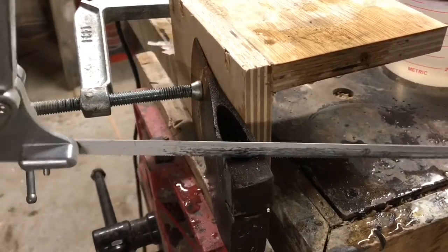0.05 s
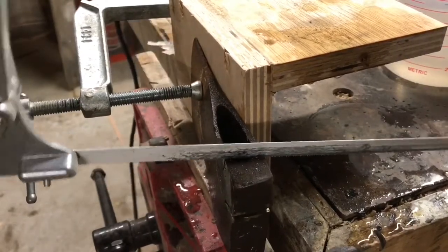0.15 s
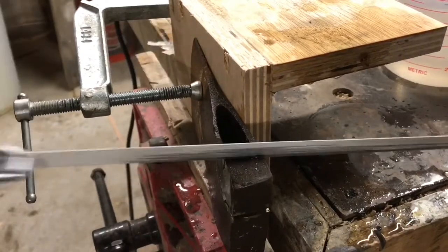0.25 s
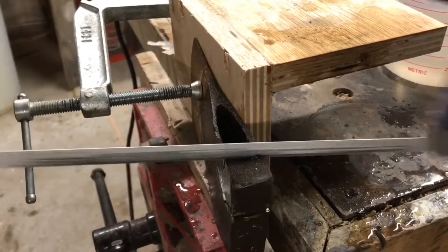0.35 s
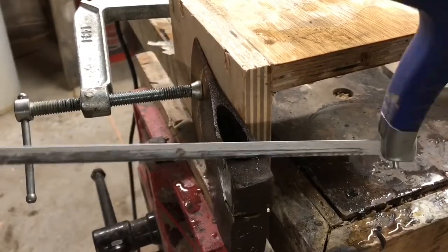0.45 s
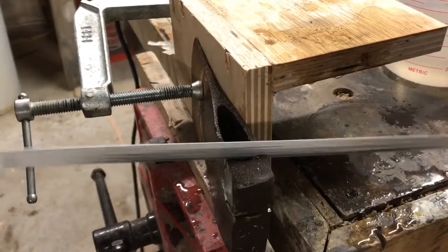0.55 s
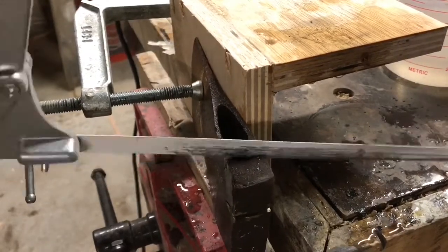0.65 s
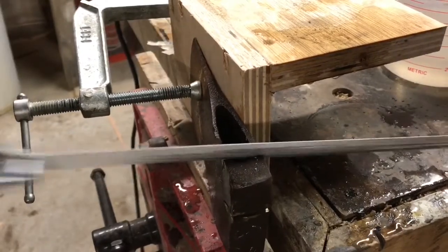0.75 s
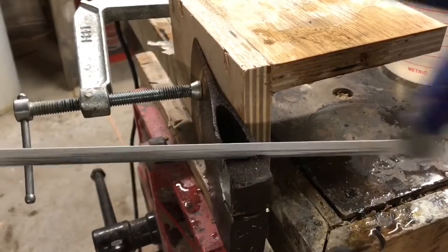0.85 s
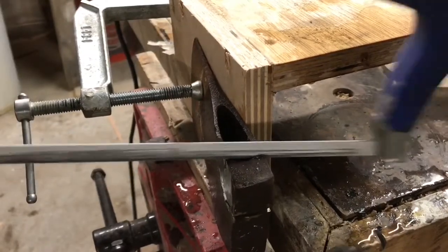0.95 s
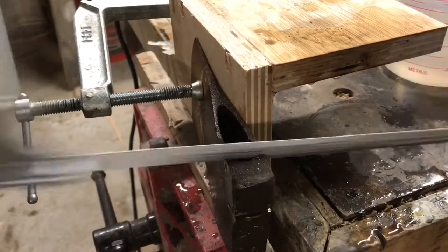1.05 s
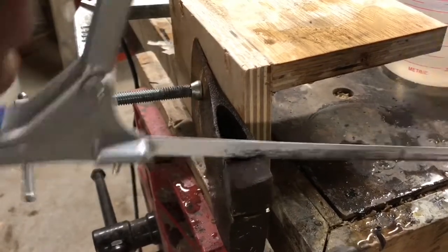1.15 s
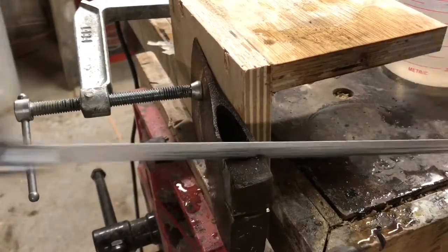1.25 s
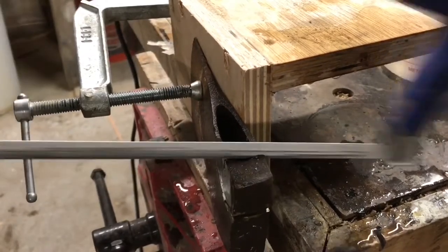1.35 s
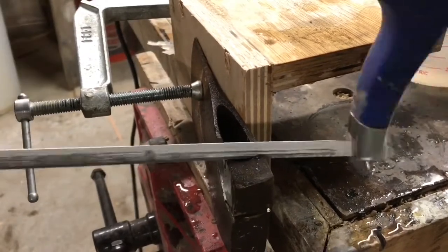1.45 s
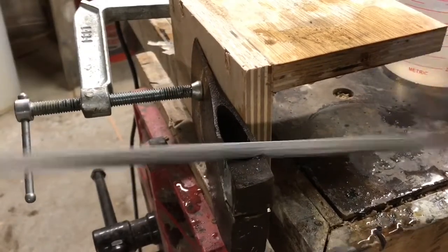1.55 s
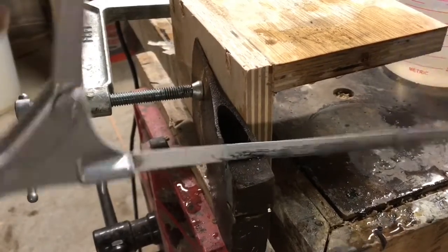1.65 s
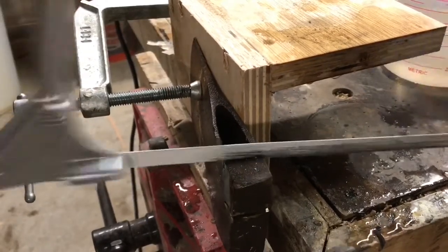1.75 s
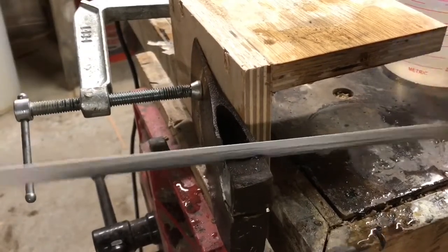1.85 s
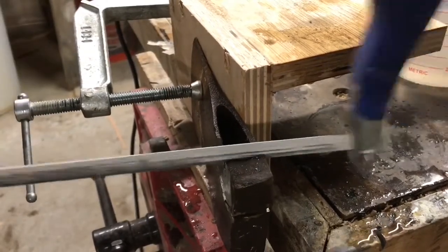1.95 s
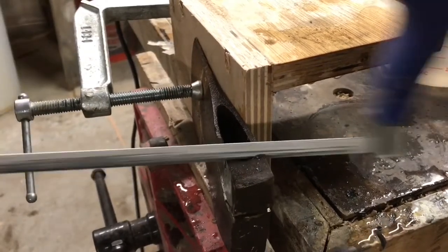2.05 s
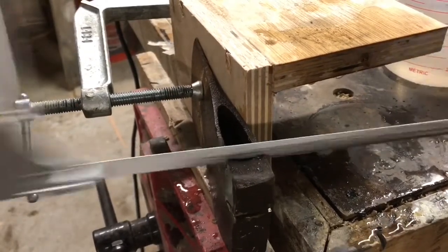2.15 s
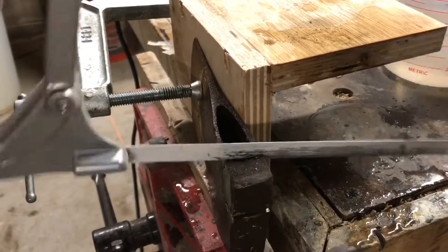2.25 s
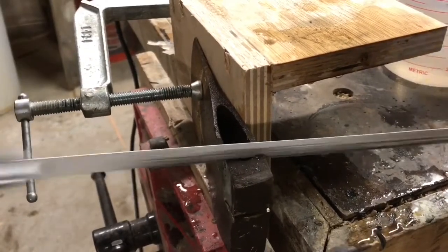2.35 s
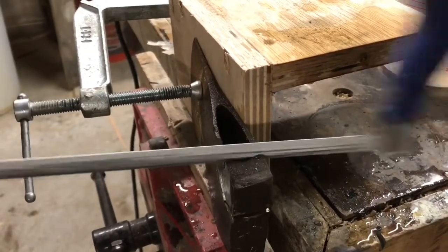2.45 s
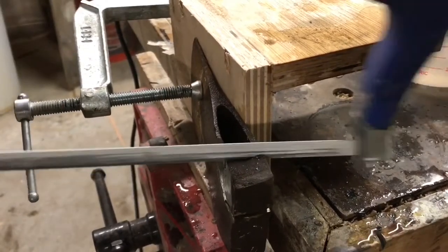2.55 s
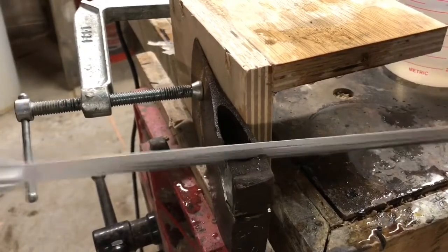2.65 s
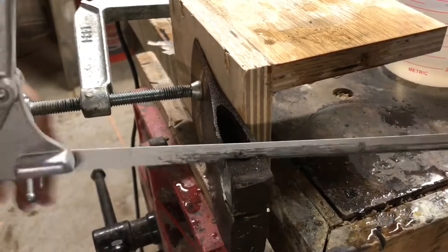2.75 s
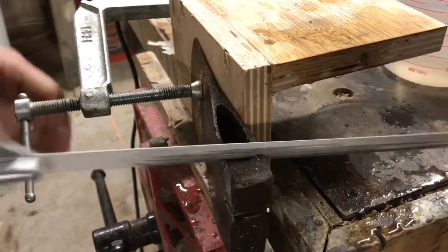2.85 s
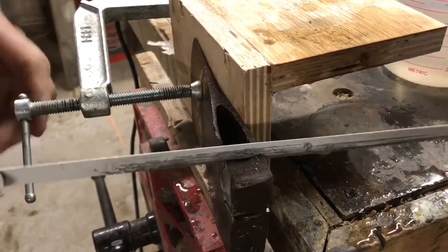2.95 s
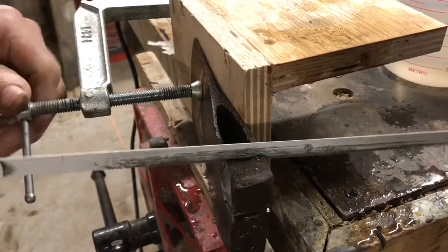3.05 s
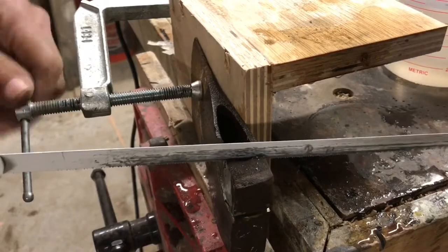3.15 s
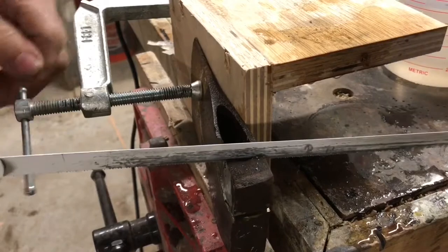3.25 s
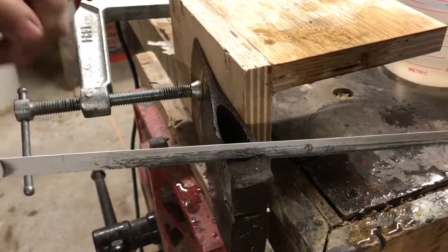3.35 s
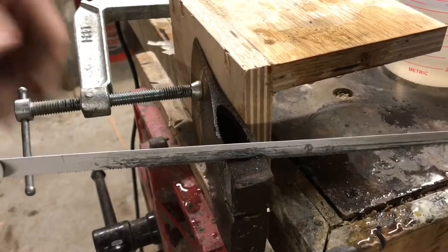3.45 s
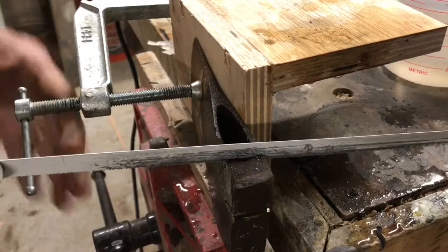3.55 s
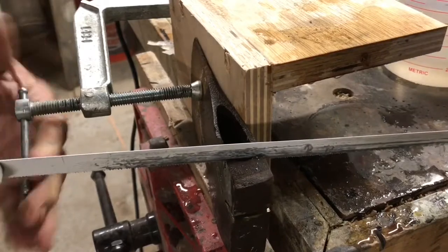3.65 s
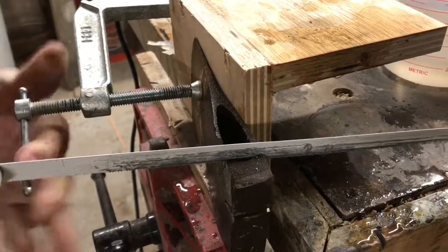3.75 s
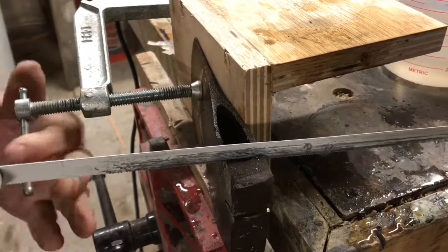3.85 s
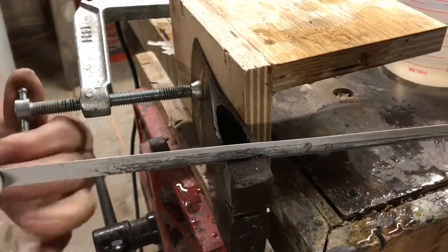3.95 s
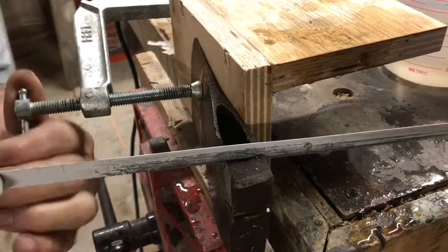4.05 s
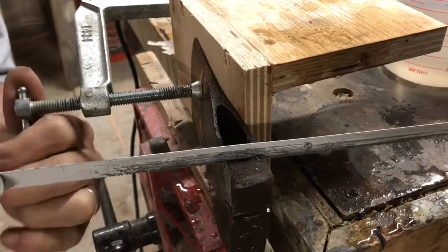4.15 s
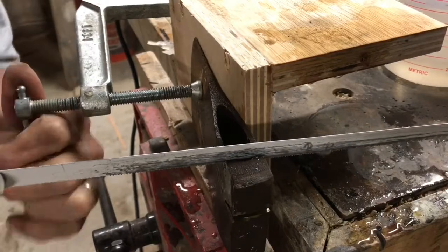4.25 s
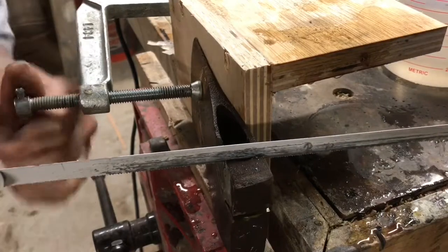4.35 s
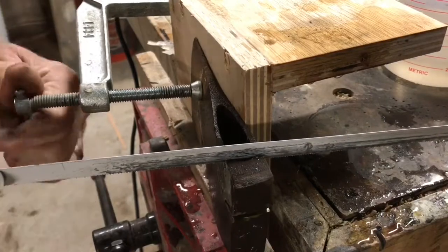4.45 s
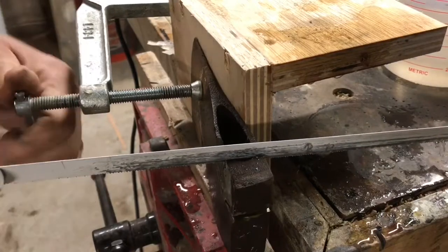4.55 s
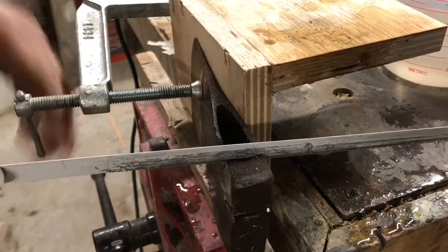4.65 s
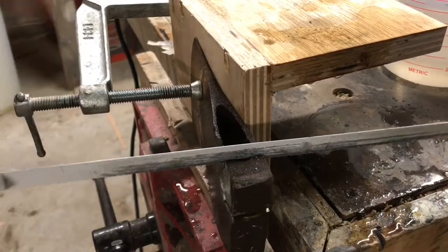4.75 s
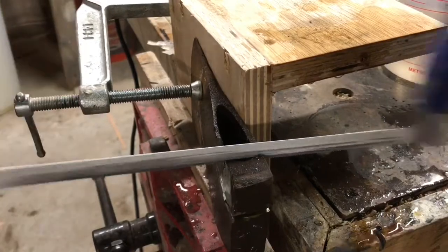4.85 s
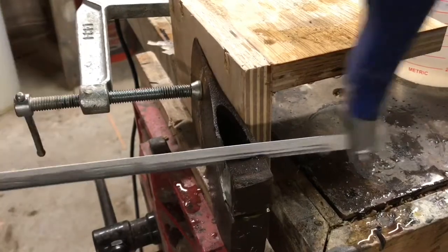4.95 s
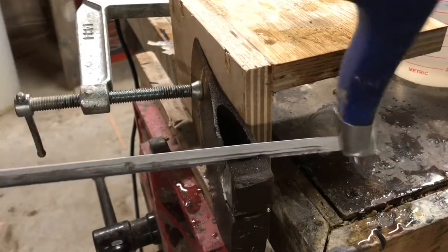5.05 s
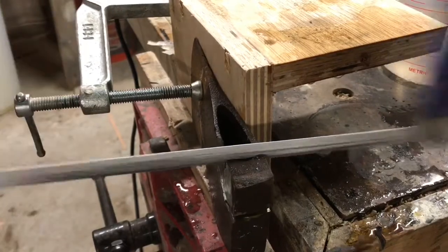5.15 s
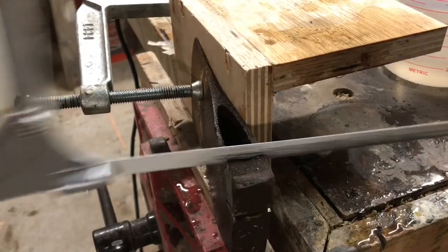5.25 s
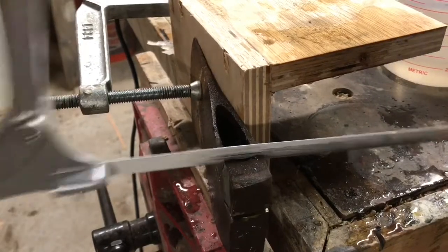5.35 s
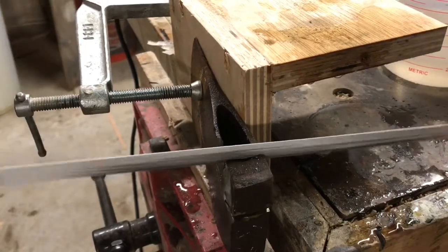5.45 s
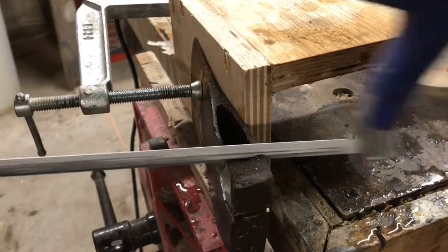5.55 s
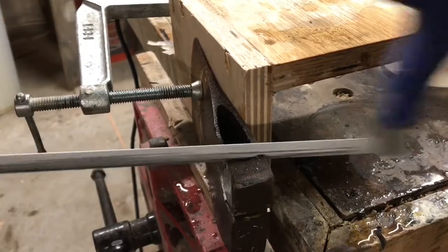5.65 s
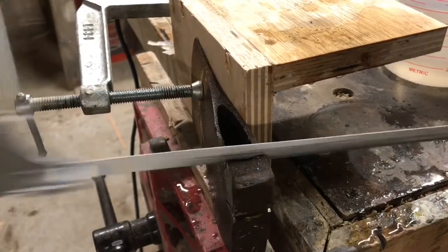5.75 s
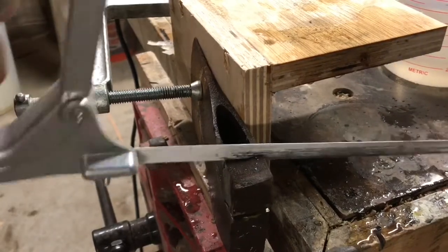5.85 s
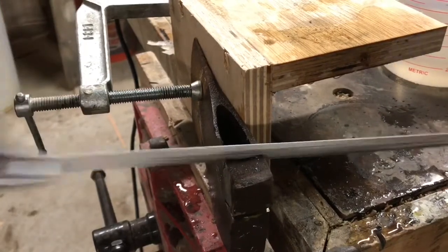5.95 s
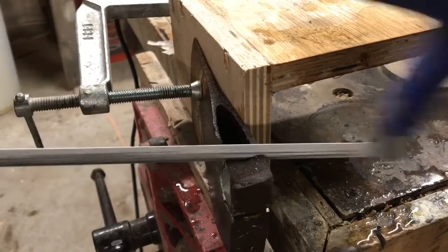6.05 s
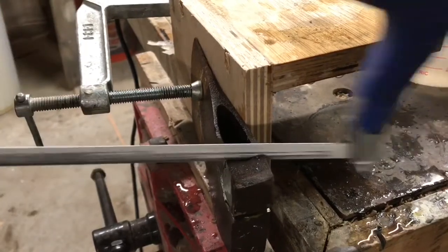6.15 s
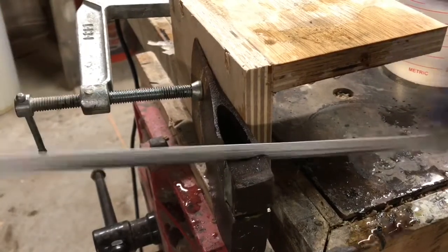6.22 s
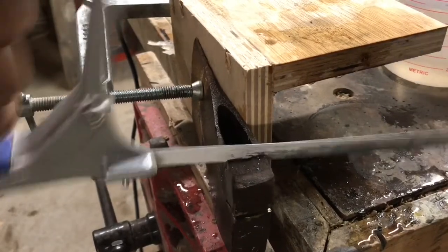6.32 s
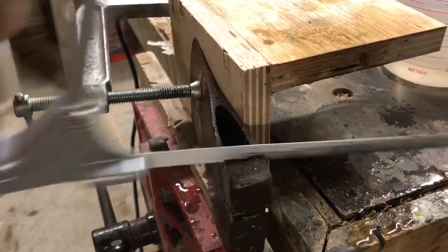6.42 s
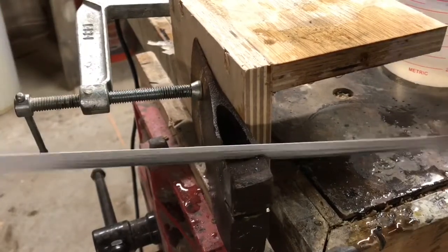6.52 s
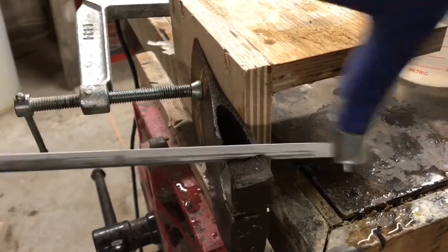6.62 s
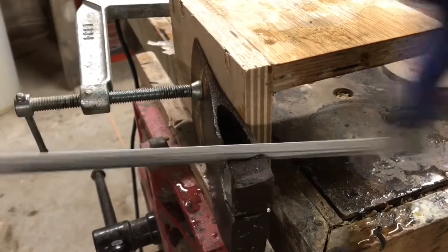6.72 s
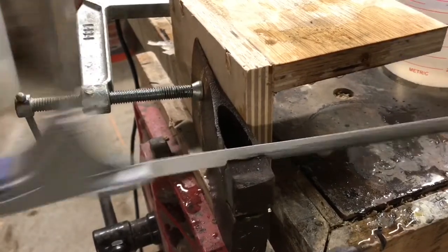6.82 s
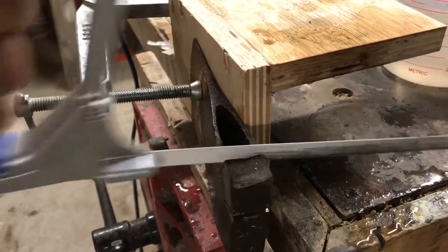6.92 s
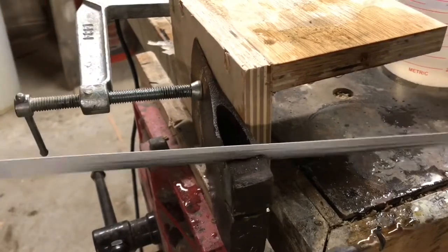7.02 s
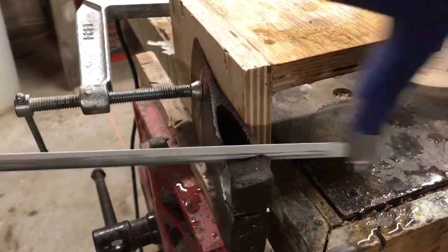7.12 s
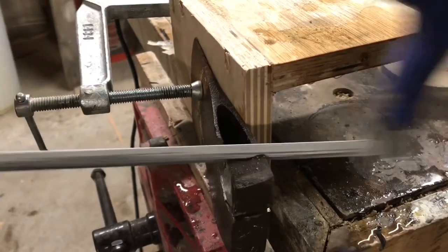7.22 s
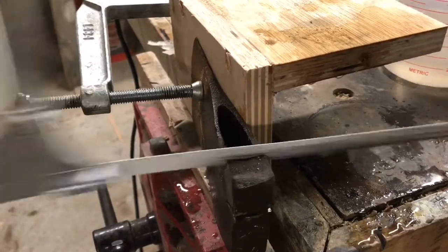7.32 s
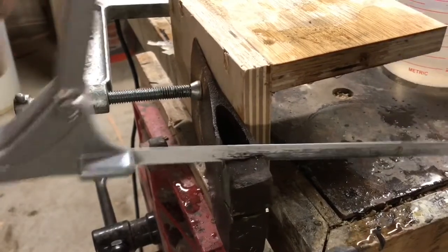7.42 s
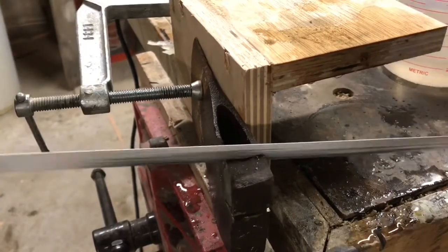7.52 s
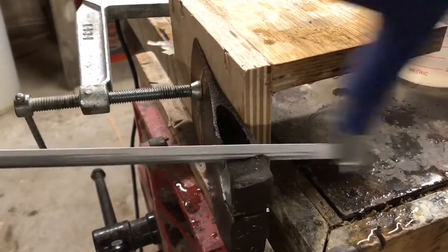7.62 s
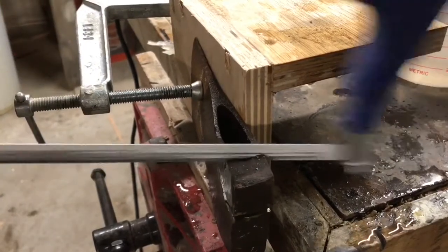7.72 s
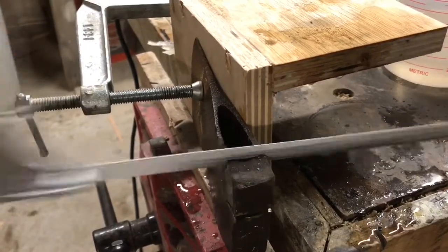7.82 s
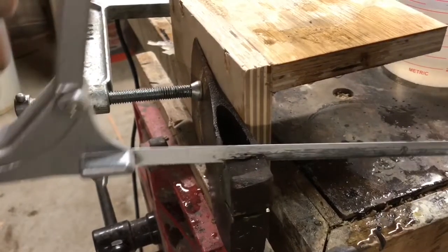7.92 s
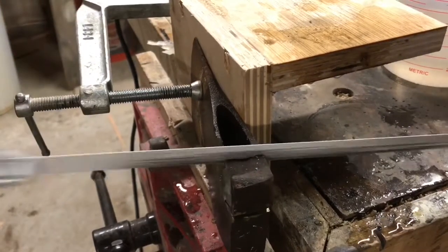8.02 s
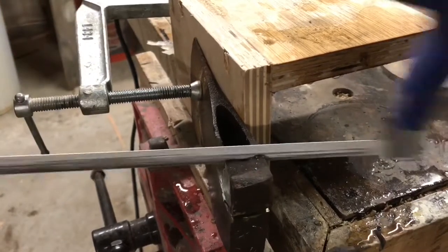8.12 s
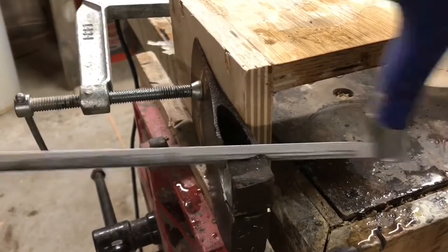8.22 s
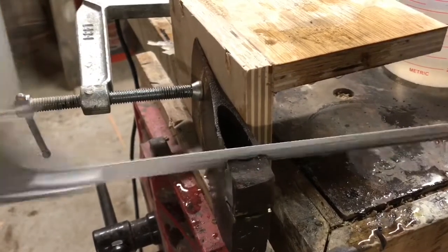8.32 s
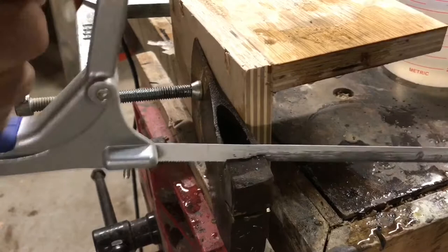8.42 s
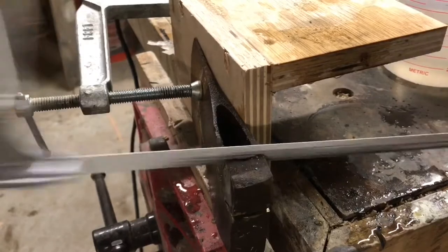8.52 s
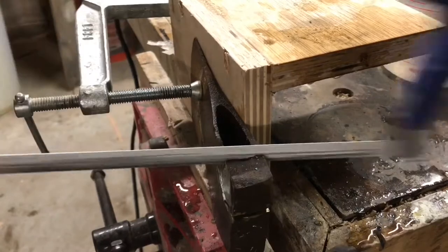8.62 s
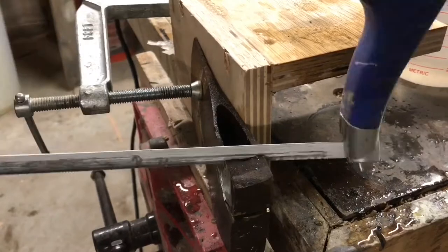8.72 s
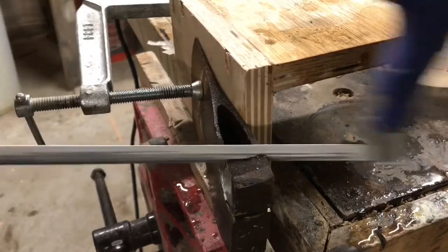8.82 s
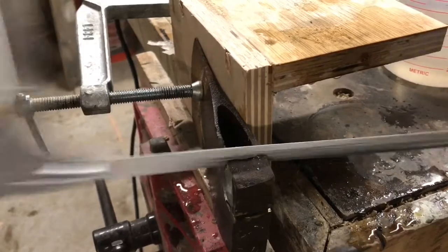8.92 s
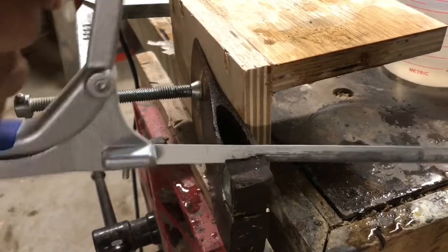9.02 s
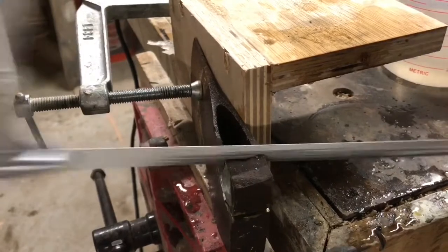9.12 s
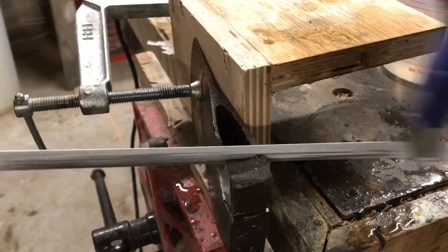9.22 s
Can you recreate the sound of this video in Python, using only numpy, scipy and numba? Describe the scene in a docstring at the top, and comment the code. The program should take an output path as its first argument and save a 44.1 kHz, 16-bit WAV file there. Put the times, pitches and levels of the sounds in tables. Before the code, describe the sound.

Close gritty metal sawing in a quiet workshop: alternating ringing strokes, a short break with small clinks and dull bumps, then more steady sawing.

```python
"""A hand hacksaw works through steel in a vise, close to a microphone in a quiet workshop.
Its passing teeth make tones and clumpy noise, which ring the blade, the frame and a loose clamp.
The bench booms under the strokes and thuds when bumped; sudden snags are short noise bursts.
Partway through, the sawing pauses and a loose clamp handle ticks. Soft air noise, a faint hum
and a short room echo lie around it all."""
import sys
import numpy as np
from scipy import signal
from scipy.fft import rfft, irfft, next_fast_len
from scipy.io import wavfile
from scipy.ndimage import uniform_filter1d
from numba import njit

SR = 44100
rng = np.random.default_rng(int(sys.argv[2]) if len(sys.argv) > 2 else 0)


def unload_wav(signal):
    """Save mono or channel-first audio to the path in sys.argv[1] as 16-bit WAV at rate SR, clipped to [-1, 1]."""
    wavfile.write(
        sys.argv[1],
        SR,
        np.round(np.clip(np.atleast_2d(signal).T, -1, 1) * 32767).astype(np.int16),
    )


N = 409233  # length in samples


def undb(db):
    """Turn decibels into a plain gain."""
    return 10 ** (np.asarray(db) / 20)


def unit(x):
    """Scale a signal to an rms level of 1."""
    return x / np.sqrt(np.mean(x ** 2))


def colour(x, points):
    """Shape the spectrum of a signal by (f/Hz, level/dB) points."""
    size = next_fast_len(N)
    log_hz = np.log(np.arange(size // 2 + 1) * SR / size + 1e-3)  # the offset avoids log(0)
    hz, db = np.transpose(points)
    gain = undb(np.interp(log_hz, np.log(hz), db))
    return irfft(rfft(x, size) * gain, size)[:N]


def ring(x, hz, width_hz):
    """One fixed resonance, gain 1 at its centre."""
    b, a = signal.iirpeak(hz, hz / width_hz, SR)
    return signal.lfilter(b, a, x + 1e-15)  # the offset keeps the numbers from getting too tiny


@njit
def sweep(x, step, damp):
    """State-variable band-pass whose centre may move (step = tan(pi f / SR)); gain 1 at the centre."""
    y, band, low = np.empty(len(x)), 0., 0.
    for i in range(len(x)):
        g = step[i]
        v = (band + g * (x[i] - low)) / (1 + g * (g + damp))
        band = 2 * v - band
        low = low + 2 * g * v
        y[i] = damp * v
    return y


def walk(rate, shape=lambda v: v):
    """Random levels, rate new ones a second, joined by straight lines."""
    count = int(N * rate / SR) + 2
    levels = shape(rng.standard_normal(count))
    return np.interp(np.arange(N) * (rate / SR), np.arange(count), levels)


def flutter(rate, depth_db):
    """A gain that wanders by about depth dB."""
    return walk(rate, lambda v: undb(depth_db * v))


def place(starts_s, grains):
    """Add short sounds together at their times."""
    out = np.zeros(N + SR)
    for s, grain in zip(starts_s, grains):
        first = int(s * SR)
        out[first:first + len(grain)] += grain
    return out[:N]


# Spectrum of the workshop air: f/Hz, relative level/dB per Hz
AIR_SPECTRUM = [(35, -40.5), (60, -21.5), (91, 0.5), (130, -12), (146, -26.5), (180, -17.5), (262, -19),
                (294, -18), (540, -21.5), (607, -21), (822, -30), (924, -29.5), (16000, -59)]
# Tones of the hum: f/Hz, level/dB rms before the flutter
HUM_TONES = [(86.1, -74), (118.4, -69), (177.6, -69.5)]
AIR_DB = -55.5  # rms


def shop():
    """Shaped noise is the soft workshop air; slowly fluttering sines are a faint hum."""
    t = np.arange(N) / SR
    hum = np.zeros(N)
    for hz, db in HUM_TONES:
        hum += np.sqrt(2) * undb(db) * flutter(8.1, 1.3) * np.sin(2 * np.pi * hz * t)
    air = unit(colour(rng.standard_normal(N), AIR_SPECTRUM))
    return undb(AIR_DB) * air + hum


# Spans when the blade lies in the cut: from t/s, to t/s
BLADE_IN_CUT = [(0.02, 3.06), (4.75, 9.28)]
DRAG_DB = -68.5  # before the flutter


def drag():
    """The blade lying in the cut scrapes faintly: treble noise with uneven loudness."""
    t = np.arange(N) / SR
    lying = sum((t > start) * (t < end) * 1. for start, end in BLADE_IN_CUT)
    lying = abs(uniform_filter1d(lying, size=800))  # soft edges
    scrape = unit(ring(rng.standard_normal(N), 8000, 9000))
    return undb(DRAG_DB) * lying * flutter(25, 4.0) * flutter(400, 4.0) * scrape


# A tooth snags and lets go: t/s, peak level/dB before the blade rings, centre f/Hz
SNAG_EVENTS = [(0.0468, -24.5, 2560), (0.109, -27.5, 2000), (0.2793, -29, 4040), (0.3043, -12, 4020),
               (0.4102, -11, 5000), (0.722, -18.5, 2850), (0.7741, -29, 6370), (0.822, -31, 4030),
               (1.1954, -14.5, 3800), (1.2692, -20.5, 8900), (1.737, -20, 3390), (2.2852, -16.5, 2856),
               (2.616, -21.5, 4340), (2.6752, -14.5, 2625), (2.827, -27, 2770), (3.0194, -36, 4570),
               (4.8437, -32, 5000), (5.0448, -24, 3560), (5.0627, -15.5, 5150), (5.3648, -23.5, 2670),
               (5.442, -35, 2703), (5.747, -19, 2710), (5.9035, -21, 3430), (5.9394, -37, 2730),
               (6.425, -30, 3940), (6.504, -20.5, 7110), (6.7489, -22.5, 2744), (6.937, -20.5, 3420),
               (7.1822, -17.5, 3390), (7.439, -19.5, 3402), (7.4914, -32, 1940), (7.9575, -18.5, 3945),
               (8.243, -23, 3013), (8.3218, -22.5, 2700), (8.4682, -17.5, 3890), (8.514, -39, 3410),
               (8.7795, -31.5, 1920), (8.8894, -22.5, 4077), (8.9216, -29, 3528), (8.964, -17, 6200),
               (9.062, -20.5, 2850), (9.1465, -30, 3500), (9.2042, -21, 2700)]
# Blade resonances, also played by blade_ring(): f/Hz, width f/Hz, relative level/dB
BLADE_MODES = [(1620, 64, -8.5), (1887, 53, 3), (2200, 30, 0), (2757, 50, 5), (3160, 99, -3),
               (3508, 120, 8), (4040, 140, 3), (5320, 180, -7), (6270, 450, -4.5), (6975, 360, -5.5),
               (8654, 180, 1), (11030, 500, -8), (12200, 1100, -15.5)]


def snags():
    """Each snag is a noise burst of a few ms that rings on in the blade."""
    t = np.arange(SR // 20) / SR
    bursts = []
    for _, peak_db, hz in SNAG_EVENTS:
        pitched = ring(rng.standard_normal(len(t)) * np.exp(-t / 0.0036), hz, 0.39 * hz)
        crack = .15 * rng.standard_normal(len(t)) * np.exp(-t / 0.0039)
        burst = pitched + crack
        bursts.append(undb(peak_db) * burst / np.abs(burst).max())
    x = place([event[0] for event in SNAG_EVENTS], bursts)
    ringing = sum(undb(db) * ring(x, hz, 0.4 * width) for hz, width, db in BLADE_MODES)
    return undb(-3.5) * x + undb(2.5) * ringing


# One saw stroke per row, levels before the mix in saw() and bench():
# start t/s, speed-up t/s, slow-down t/s, peak level/dB, first bite level/dB under the peak,
# push -1 or pull 1, top tooth rate f/Hz, frame level/dB, bench level/dB,
# then tooth chatter, fine hiss and clamp rattle level/dB relative to the grinding
STROKE_ROWS = [(0.279, 0.11, 0.18, -31, -6.5, -1, 600.5, -43, -50, -19, 1, -7.5),
               (0.57, 0.08, 0.097, -29, -10.5, 1, 794, -38.5, -50.6, -15, -10, -9.5),
               (0.815, 0.048, 0.18, -28.5, -16, -1, 619, -43, -55, -9.5, -13, -16),
               (1.04, 0.066, 0.131, -27.5, -14, 1, 1087, -34.5, -49.5, -13.5, -5.5, -11),
               (1.285, 0.065, 0.178, -27.5, -15.5, -1, 696.3, -42, -51.5, -7, -6, -15),
               (1.575, 0.077, 0.096, -25.5, -19.5, 1, 1003, -36.5, -50, -12, -5.5, -11.5),
               (1.845, 0.049, 0.19, -28.5, -10.5, -1, 696.3, -40.5, -52, -18, -6, -16),
               (2.125, 0.074, 0.11, -26.5, -15, 1, 981, -38.5, -49, -9, -7, -7.5),
               (2.385, 0.045, 0.19, -27, -9, -1, 691.6, -41, -56.5, -15.5, -9, -18),
               (2.615, 0.126, 0.084, -29, -19, 1, 842, -39, -51.5, -18, -6, -9),
               (2.895, 0.075, 0.089, -39, -10.5, -1, 598.5, -47.5, -50.5, -4.5, -3, -5),
               (4.842, 0.063, 0.19, -34, -12.5, -1, 596, -46.6, -52.5, -12.5, -6, -29),
               (5.15, 0.142, 0.085, -24.5, -30.5, 1, 897, -39.5, -50.5, -18.5, -7, -16),
               (5.44, 0.103, 0.16, -27.5, -21, -1, 725.6, -39.5, -54, -14, -9, -22),
               (5.715, 0.083, 0.12, -26.5, -14, 1, 997, -36, -47.5, -13, -6.5, -12),
               (5.985, 0.097, 0.115, -24, -19.7, -1, 746, -39.5, -54, -13.5, -9, -18),
               (6.225, 0.112, 0.099, -26, -19, 1, 1004, -36.7, -47.5, -10.5, -13, -12),
               (6.5, 0.118, 0.11, -26.5, -12, -1, 750, -38, -50.9, -15.5, -8, -18),
               (6.745, 0.125, 0.095, -24.5, -25, 1, 1057, -34, -48.3, -18, -4.5, -14),
               (7.015, 0.104, 0.12, -26, -16.5, -1, 731, -38.5, -59, -12, -10.5, -17),
               (7.26, 0.097, 0.088, -22, -30, 1, 1000, -34.5, -48.5, -5.5, -5.5, -14),
               (7.53, 0.09, 0.14, -25.5, -24, -1, 733, -41, -59, -21, -8, -14),
               (7.79, 0.096, 0.087, -25, -12.5, 1, 1048, -35, -47.5, -9.5, -9, -15),
               (8.05, 0.073, 0.13, -27, -10.5, -1, 697, -41.5, -52.5, -18, -8.5, -20),
               (8.31, 0.107, 0.066, -22.5, -15.5, 1, 810, -37, -49, -17.5, -4.5, -21),
               (8.56, 0.082, 0.15, -28, -19, -1, 720, -40, -51.3, -14, -3.5, -19),
               (8.887, 0.082, 0.11, -27.5, -11.5, 1, 950, -38.5, -55, -13, -10, -10),
               (9.145, 0.039, 0.4, -31.5, -16, -1, 530, -39.5, -54, -11, -7, -23)]
BITE_S = 0.015  # smooths the onset
SLOWED_DB, SLOW_POWER = -22.5, 1.92  # drop at the end of the slow-down and its curve
# above the knee the frame hardly follows the grinding; it is louder near the far end of the blade
FRAME_FOLLOW, FRAME_KNEE_DB, FRAME_LEAN_DB = .1, -14, 4
BENCH_FOLLOW, BENCH_LEAN_DB, BENCH_SMOOTH_S = 0.13, 5, .06
STOP_STRETCH = 1.15  # the blade stops a little after the grinding has faded


def strokes():
    """Controls along time; each stroke bites, speeds up to its peak and slows down until the next one."""
    t, out = np.arange(N) / SR, np.zeros((7, N))
    ends = [row[0] for row in STROKE_ROWS[1:]] + [N / SR]
    for row, end in zip(STROKE_ROWS, ends):
        start, up_s, down_s, peak_db, bite_db, way, top_hz, frame_db, bench_db, *share_db = row
        on = slice(int(start * SR), int(min(end, start + .5) * SR))
        late = t[on] - start - up_s  # seconds after the peak
        slowing_db = SLOWED_DB * abs(late / down_s) ** SLOW_POWER
        drop = np.where(late < 0, bite_db * (late / up_s) ** 2, slowing_db)
        grind_db = peak_db + drop
        travel = np.clip((t[on] - start) / (up_s + down_s), 0, 1)
        lean = np.sign(way) * (travel - .5)
        frame_drop = np.minimum(FRAME_FOLLOW * drop, drop - (1 - FRAME_FOLLOW) * FRAME_KNEE_DB)
        out[0, on] = undb(grind_db)
        out[1, on] = undb(frame_db + FRAME_LEAN_DB * lean + frame_drop - grind_db)
        out[2, on] = undb(bench_db + BENCH_LEAN_DB * lean + BENCH_FOLLOW * drop)
        swing = np.where(late < 0, late / up_s, late / down_s / STOP_STRETCH)
        out[3, on] = top_hz * np.cos(np.pi / 2 * np.clip(swing, -1, 1))
        out[4:, on] = undb(share_db)[:, None]
    out[0] = abs(uniform_filter1d(out[0], int(BITE_S * SR)))
    out[2] = uniform_filter1d(out[2], int(BENCH_SMOOTH_S * SR))
    return out


def passing_teeth(gain, rate):
    """Teeth ride over the edge at the passing rate, with clumps of grit noise between them."""
    phase = 2 * np.pi * np.cumsum(rate * (1 + .045 * walk(150))) / SR
    tones = np.sin(phase) + .5 * np.sin(2 * phase) + .35 * np.sin(4 * phase)
    teeth = flutter(70, 3.5) * tones * np.clip(rate / 600, 0, 1) ** 2  # weak when slow
    clumps = flutter(300, 2.2) * flutter(60, 1.0) * (1 + .4 * np.cos(phase))
    grit = gain * unit(rng.standard_normal(N) * clumps)
    return teeth, grit


# Spectrum of the rasp: f/Hz, relative level/dB per Hz
RASP_SPECTRUM = [(590, -41), (1000, -9.5), (1580, -2.5), (1740, -9.5), (2210, -1.5), (2420, -4.5),
                 (2750, 2.5), (2980, -2.5), (3500, -4), (5000, -10), (8680, -9.5), (10200, -17.5),
                 (15600, -10.5)]


def rasp(grit):
    """The grit noise in six bands, each clumping on its own."""
    bands = np.zeros(N)
    for hz in 1100 * 1.7 ** np.arange(6):
        bands += flutter(45, 3.48) * ring(grit, hz, 0.39 * hz)
    return colour(bands, RASP_SPECTRUM)


def blade_ring(force):
    """The blade's modes, their centres wandering slowly at random; returns main and fine parts."""
    wander = 0.039 * walk(10)
    modes = []
    for k, (hz, width, db) in enumerate(BLADE_MODES):
        step = np.tan(np.pi * hz / SR) * (1 + wander * (-1) ** k)  # neighbours shift opposite ways
        modes.append(undb(db) * flutter(35, 5.9) * sweep(force, step, width / hz))
    return sum(modes[:-4]), sum(modes[-4:])


# Frame resonances: f/Hz, width f/Hz, relative level/dB
FRAME_MODES = [(300.8, 10, -2.5), (397, 40, -5.5), (543, 45, 9), (678.2, 36, 9), (872.6, 49, -0.5),
               (1124, 35, -9)]


def frame_ring(grit, groan):
    """The frame answers when the tooth rate crosses its modes, over a broad low-mid hump."""
    modes = sum(undb(db) * flutter(18, 4.9) * ring(groan, hz, width) for hz, width, db in FRAME_MODES)
    return modes + undb(-13.5) * ring(grit, 650, 570)


def clamp_rattle(grit):
    """The grit shakes one narrow, unsteady clamp resonance."""
    return flutter(30, 3.5) * ring(grit, 4470, 100)


def saw(gain, frame_gain, rate, chatter, hiss, rattle):
    """The teeth chatter and grind over the cut and ring blade, frame and clamp."""
    teeth, grit = passing_teeth(gain, rate)
    tooth_tone = gain * chatter * teeth
    broad = rasp(grit)
    blade, fine = blade_ring(10. ** -15 + grit + tooth_tone)
    frame = frame_ring(grit, grit + undb(-4.0) * tooth_tone)
    clamp = clamp_rattle(grit)
    high = signal.sosfilt(signal.butter(3, 6500, "high", fs=SR, output="sos"), broad)

    def scale(x, db):
        """Set the rms level relative to that of the grinding gain."""
        return x * undb(db) * np.sqrt(np.mean(gain ** 2) / np.mean(x ** 2))

    bite = (gain / undb(-23.0)) ** 0.17  # harder strokes are brighter
    body = scale(broad - high, -2.73) + scale(blade, -6) + frame_gain * scale(frame, -0.36)
    treble = hiss * bite * (scale(high, -7.5) + scale(fine, -3))
    return body + undb(-6.5) * tooth_tone + treble + rattle * scale(clamp, -0.59)


# Dull bumps on the bench: t/s, relative level/dB, f/Hz, time to fade by 60 dB t/s
BUMP_EVENTS = [(0.331, -32, 89, 0.25), (1.186, -26, 91.1, 0.13), (1.23, -26.5, 250, 0.061),
               (2.032, -31.5, 61.25, 0.27), (3.165, -41.5, 75, 0.15), (3.197, -36, 90, 0.12),
               (3.256, -28, 72.4, 0.13), (3.359, -35, 80, 0.14), (3.419, -47, 67.6, 0.2)]
THUD_RUSTLE_DB, THUD_RUSTLE_S = -10.5, .04  # low-mid noise of a bump and its fade


def bench(shake):
    """The bench top booms near its lowest modes and thuds when bumped: fading sines plus soft noise."""
    noise = rng.standard_normal(N)
    low = ring(ring(noise, 92, 35), 98, 40)
    upper = ring(ring(noise, 140, 54), 140, 110)
    boom = unit(low + 1.2 * upper)
    t = np.arange(SR // 2) / SR
    thuds = []
    for _, db, hz, t60 in BUMP_EVENTS:
        tone = np.sin(2 * np.pi * hz * t) * 1000 ** (-t / t60)
        noise = unit(ring(ring(rng.standard_normal(len(t)), 200, 300), 200, 300))
        rustle = undb(THUD_RUSTLE_DB) * np.exp(-t / THUD_RUSTLE_S) * noise
        thuds.append(undb(db) * (1 - np.exp(-t / 0.0051)) * (tone + rustle))
    return shake * flutter(6, 2) * boom + place([event[0] for event in BUMP_EVENTS], thuds)


# The blade sings on the first stroke: from t/s, to t/s, f/Hz, level/dB rms
BLADE_SQUEAL = (.32, .5, 4680, -35)


def squeal():
    """A narrow, unsteady blade tone: noise through one sharp resonance."""
    start, end, hz, db = BLADE_SQUEAL
    edges = [start - .02, start + .02, end - .05, end + .02]
    gate = np.interp(np.arange(N) / SR, edges, [0, 1, 1, 0])
    return undb(db) * gate * unit(ring(rng.standard_normal(N), hz, 60))


# The clamp handle ticks against its screw: t/s, relative level/dB,
# then low body and 3 kHz clink level/dB relative to the handle modes
TICK_EVENTS = [(3.266, -32.5, 5, 0), (3.28, -32, 16, -3), (3.3413, -61, 28, 8), (3.4994, -64, 13, 0),
               (3.5665, -65, 17, 3), (3.7338, -41.5, 22, 8), (4.2846, -50.5, 1, -9), (4.3909, -50, -2, 3),
               (4.4063, -39, -8, 2), (4.4313, -43, -7, 5), (4.445, -40, -8, 5), (4.459, -48, -2, 5),
               (4.538, -61, 8, -8), (4.595, -40.5, -3, 9), (4.61, -50, -5, 11), (4.6877, -64, 0, 12),
               (4.7497, -24.5, 10.5, 0)]
# Steel handle modes: f/Hz, relative level/dB, time to fade by 60 dB t/s
HANDLE_MODES = [(1183, -14.5, 0.047), (2080, -19.5, 0.05), (2730, -28, 0.044), (3290, -5.5, 0.025),
                (3560, 0, 0.021), (4520, 1, 0.049), (5450, -12, 0.033), (6200, -6, 0.023),
                (7490, -6, 0.018), (9360, -8, 0.017), (13100, -31, 0.018), (14300, -16, .02)]


def ticks():
    """A short rattling contact: a dry crack that drives the steel handle modes."""
    t = np.arange(SR // 4) / SR
    hz, db, t60 = np.transpose(HANDLE_MODES)[:, :, None]
    body, clink = hz < 2500, abs(hz - 3200) < 200
    grains = []
    for _, tick_db, body_db, clink_db in TICK_EVENTS:
        contact = rng.standard_normal(len(t)) * (np.exp(-t / 0.0057) + 0.087 * np.exp(-t / 0.013))
        strike = db + body * body_db + clink * clink_db
        strike = strike + 2 * rng.standard_normal(hz.shape)  # no two ticks alike
        modes = np.sum(undb(strike) * np.sin(2 * np.pi * hz * t) * 1000 ** (-t / t60), axis=0)
        rung = signal.fftconvolve(modes, contact)[:len(t)]
        crack = ring(contact, 5800, 6000)
        grains.append(undb(tick_db) * (undb(-31) * rung + undb(-2.5) * crack))
    return place([event[0] for event in TICK_EVENTS], grains)


ROOM_T60_S, ROOM_DB = 0.23, -16  # fade by 60 dB; echo level


def room(near):
    """Echo from the walls: the sound smeared by fading noise that starts after 6 ms."""
    t = np.arange(SR // 2) / SR
    walls = rng.standard_normal(len(t)) * 1000 ** (-t / ROOM_T60_S) * (t > .006)
    walls = signal.lfilter([1], [1, -.4], walls)  # the walls swallow some treble
    walls = walls / np.sqrt(np.sum(walls ** 2))
    return undb(ROOM_DB) * signal.fftconvolve(near, walls)[:N]


def scene():
    """Saw, snags and ticks get a room echo; bench and workshop air are added without it."""
    gain, frame, shake, rate, chatter, hiss, rattle = strokes()
    near = saw(gain, frame, rate, chatter, hiss, rattle)
    near = near + squeal() + snags() + ticks() + drag()
    heard = near + room(near) + bench(shake) + shop()
    return np.array([heard, heard])


TOP_HZ = 15700  # nearly nothing passes above this


def record(dry):
    """One microphone without deep bass and with a lift at the very top; loud peaks are rounded, the top is cut."""
    x = signal.sosfilt(signal.butter(3, 48, "high", fs=SR, output="sos"), dry[0])
    lifted = x + .6 * ring(x, 15500, 900)
    x = np.tanh(3.5 * lifted) / 3.5
    x = signal.sosfilt(signal.ellip(14, .2, 80, TOP_HZ, fs=SR, output="sos"), x)
    return np.array([x, x])


dry = scene()
out = record(dry)
unload_wav(out)
```